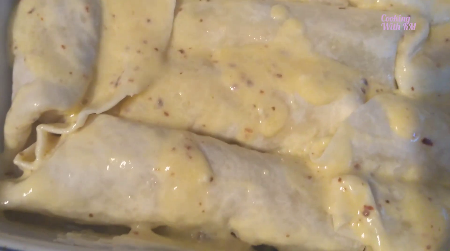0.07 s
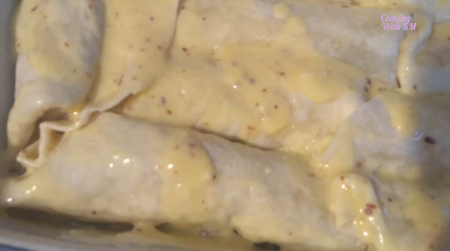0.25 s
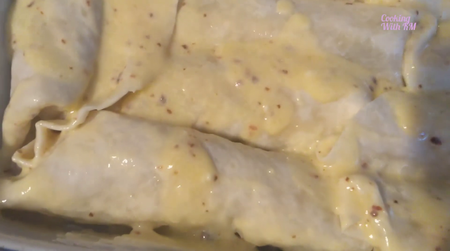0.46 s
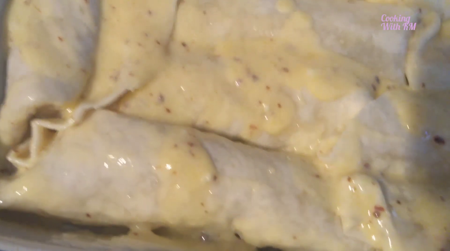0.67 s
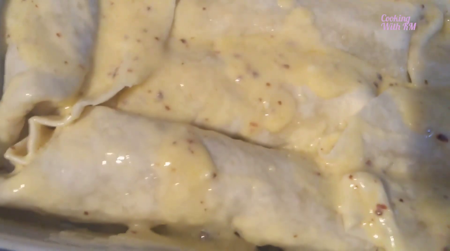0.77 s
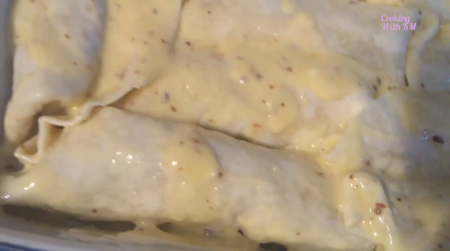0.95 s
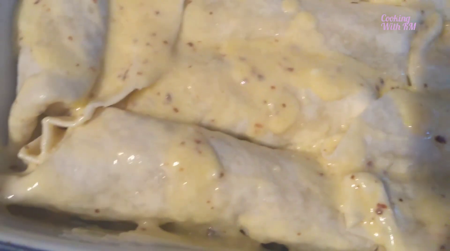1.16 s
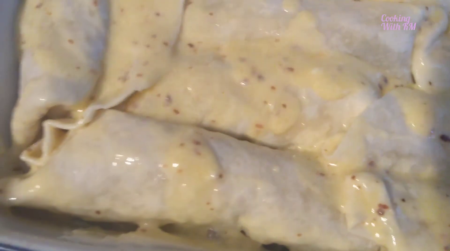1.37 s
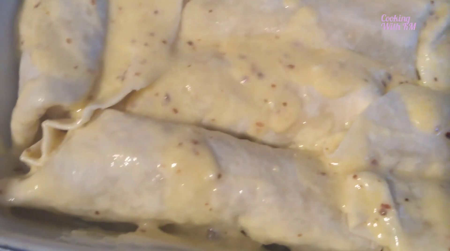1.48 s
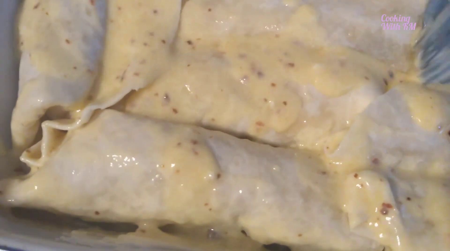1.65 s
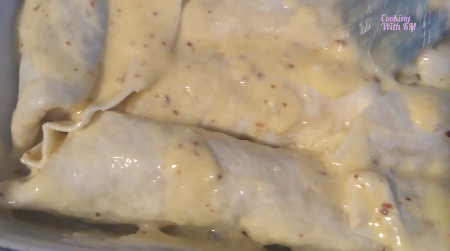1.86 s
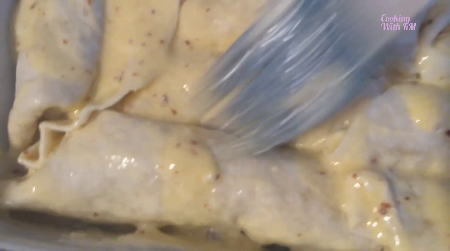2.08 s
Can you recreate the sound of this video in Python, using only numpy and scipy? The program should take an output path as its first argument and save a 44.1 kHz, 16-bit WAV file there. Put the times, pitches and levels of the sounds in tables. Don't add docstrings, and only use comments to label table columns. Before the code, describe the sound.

A brush handle knocks a baking dish on a hollow counter: one loud, dull thunk at 0.22 seconds, weaker rattling bounces, then a tight clatter at 0.41-0.45 with brief glassy ringing. Low fridge hum and room noise dip, then slowly rise. A tiny wet click at 0.9, faint squeak at 1.23, bristle scratch and sharp click near 1.65, light bright rim tap at 1.72, faint clicks at 1.83.

```python
import sys
import numpy as np
from scipy import signal
from scipy.fft import rfft, irfft, next_fast_len
from scipy.io import wavfile

SR = 44100
rng = np.random.default_rng(int(sys.argv[2]) if len(sys.argv) > 2 else 0)


def undo_db(level):
    steps = np.asarray(level, float) / 20
    return 10 ** steps


def put_to_file(sound):
    columns = np.atleast_2d(sound).T
    safe = np.clip(columns, -1, 1)
    whole_steps = np.round(safe * 32767)
    wavfile.write(sys.argv[1], SR, whole_steps.astype(np.int16))


N = 92610

BRUSH_RIGHT_LAG_S = 0.00008


def rms_one(x):
    return x / np.sqrt(np.mean(x ** 2) + 1e-20)


def since(s):
    return np.arange(N) / SR - s


def at_hz(points, hz):
    table_hz, value = np.transpose(points)
    return np.interp(np.log(hz), np.log(table_hz), value)


def band(x, low_hz, high_hz):
    return signal.sosfilt(signal.butter(2, [low_hz, high_hz], "band", fs=SR, output="sos"), x)


def body_low_cut(x):
    return signal.sosfilt(signal.butter(4, 217, "high", fs=SR, output="sos"), x)


def drift(rate_hz):
    hop = 40
    r = np.exp(-2 * np.pi * rate_hz * hop / SR)
    noise = rng.standard_normal(N // hop + 2002)
    slow = signal.lfilter([1], [1, -2 * r, r * r], noise)[2000:]
    return np.interp(np.arange(N) / hop, np.arange(len(slow)), rms_one(slow))


def ring(clicks, hz, t60):
    r, w = undo_db(-60 / (t60 * SR)), 2 * np.pi * hz / SR
    return signal.lfilter([0, np.sin(w)], [1, -2 * r * np.cos(w), r * r], clicks + 1e-18)


def pan(db):
    return undo_db([[db / 2], [-db / 2]])


def late(x, side, s):
    out = x.copy()
    out[side] = np.interp(since(s), since(0), x[side])
    return out


def air():
    # f/Hz, level/dB per Hz
    spectrum = [(30, -43), (60, -11), (150, -16.5), (300, -9.5), (700, -24.5), (1800, -29.5), (5000, -37.5),
                (14500, -46)]
    # f/Hz, correlation
    likeness = [(60, 0.68), (300, 0.58), (1000, 0.1), (4000, 0.093)]
    level_db, patchy_db = -10, 1.32
    out, edges = 0, 30 * 2 ** np.arange(0, 9.1, .5)
    white = rng.standard_normal((2, 2, N))
    for k, (low, high) in enumerate(zip(edges, edges[1:])):
        mid, side = band(white[k % 2], low, high)
        hz = np.sqrt(low * high)
        alike = np.clip(at_hz(likeness, hz), -1, 1)
        stereo = np.sqrt(1 + alike) * mid + np.sqrt(1 - alike) * side * [[1], [-1]]
        out = out + undo_db(at_hz(spectrum, hz) + patchy_db * drift(1.8)) * stereo
    return undo_db(level_db) * rms_one(out)


def hum():
    # f/Hz, left level/dB, right level/dB, right phase lag/rad
    lines = [(55.8, -38.5, -7, 2.1), (119.2, 1, -7.5, -0.96), (165.2, -14.5, -16.5, 0.57),
             (238.5, -13.5, -14.5, 1.32), (493, -22.5, -32, 0.47)]
    waver_db = .6
    out = np.zeros((2, N))
    for hz, left_db, right_db, lag in lines:
        level = np.sqrt(2) * undo_db([[left_db], [right_db]]) * undo_db(waver_db * drift(1.8))
        out += level * np.sin(2 * np.pi * hz * since(0) - np.array([[0], [lag]]))
    return out


def squeak():
    # t/s, length/s, f/Hz, level/dB, pan/dB
    slips = [
        (1.226, .045, 3400, -54, 3),
        (1.254, .03, 2775, -55, 2),
        (1.278, .02, 2915, -58, 2),
        (1.24, .03, 3850, -65, 2),
        (1.278, .04, 3790, -66, 4),
        (1.295, .025, 2760, -64, 0),
    ]
    level_db, wobble_hz, rub_db = -0.5, 17.8, -9
    out = np.zeros((2, N))
    rub = rms_one(band(rng.standard_normal((2, N)), 2400, 3760))
    for s, length, hz, db, pan_db in slips:
        shape = np.sin(np.pi * np.clip(since(s) / length, 0, 1)) ** .7
        phase = 2 * np.pi * np.cumsum(hz + wobble_hz * drift(56.0)) / SR
        level = undo_db(db + level_db + 2 * drift(81))
        out += level * shape * (np.sin(phase) + undo_db(rub_db) * rub) * pan(pan_db)
    return out


def clicks():
    # t/s, level/dB, dull part relative level/dB, pan/dB
    snaps = [(0.911, -55, -3, 13), (1.6235, -66, 16, 1), (1.626, -66, 17, 1), (1.6282, -62, 13, 0),
             (1.629, -64, 14, 2), (1.633, -61, -6, 2), (1.6365, -55.5, 9, 12), (1.64, -59, 7, 9),
             (1.644, -47, -18, 20), (1.6489, -25.5, -6.5, 10.5), (1.6526, -37, -21, 11),
             (1.8325, -68, 18, 7), (1.8372, -65, 25, 5), (1.839, -67.5, 24.5, 8), (1.8385, -78, 14, 6)]
    # f/Hz, level/dB, t60/s
    dull_modes = [(800, 1.5, 0.0035), (1500, -13, 0.0015), (2650, 6, 0.0011)]
    # f/Hz, level/dB, t60/s
    bright_modes = [(6200, -27, 0.0023), (8680, 6, 0.003), (11750, -14.5, 0.0092)]
    dull, bright = np.zeros((2, 2, N))
    for s, db, dull_db, pan_db in snaps:
        dull[:, int(s * SR)] += undo_db(db + dull_db) * pan(pan_db)[:, 0]
        bright[:, int(s * SR)] += undo_db(db) * pan(pan_db)[:, 0]
    scratch_from_s, scratch_to_s, scratch_per_s, scratch_db = 1.62, 1.648, 1500, -58
    during = (since(scratch_from_s) > 0) * (since(scratch_to_s) < 0)
    scratch = during * (rng.random((2, N)) < scratch_per_s / SR) * rng.standard_normal((2, N))
    dull += undo_db(scratch_db) * scratch[0]
    bright += undo_db(scratch_db - 7.5) * scratch[1]
    out = np.zeros((2, N))
    for impulses, modes in ((dull, dull_modes), (bright, bright_modes)):
        for hz, db, t60 in modes:
            out += undo_db(db) * ring(impulses, hz, t60)
    return late(out, 1, BRUSH_RIGHT_LAG_S)


def tap():
    # f/Hz, level/dB, t60/s
    rim_modes = [(329, 5, 0.06), (429.5, -5.5, 0.09), (600, -1.5, 0.036), (747, -8.5, 0.067),
                 (1119, -13.5, 0.066), (1410, -16.5, 0.03), (2940, -3.5, 0.0063), (5490, -4, 0.015),
                 (5400, -1, 0.024), (5770, 2.5, 0.025), (7070, 0, 0.0081), (8920, 6.5, 0.005),
                 (10300, 1, 0.0044)]
    tap_s, tap_db, chatter_s, pan_db = 1.7195, -30, 0.018, 6
    hiss_db, hiss_from_hz = 0.5, 3300
    t = since(tap_s)
    envelope = (t > 0) * np.exp(-(t / chatter_s) ** 2)
    chatter = envelope * rng.standard_normal((len(rim_modes) + 2, N))
    chatter[:2] *= np.exp(-np.abs(t) / 0.0022)
    hiss = undo_db(hiss_db) * signal.lfilter(*signal.butter(1, hiss_from_hz, "high", fs=SR), chatter[-2:])
    chatter /= np.sqrt((chatter ** 2).sum(axis=1, keepdims=True))
    body = sum(undo_db(db) * ring(c, hz, t60) for (hz, db, t60), c in zip(rim_modes, chatter))
    return late(undo_db(tap_db) * pan(pan_db) * (body_low_cut(body) + hiss), 1, BRUSH_RIGHT_LAG_S)


def knocks():
    # t/s, level/dB, contact cut-off f/Hz, crack level/dB
    impacts = [(0.2245, -5.5, 1700, 7), (0.233, -17.5, 905, 9), (.245, -23, 900, -1),
               (0.257, -29.5, 1200, -1), (0.266, -30.5, 505, -6), (.281, -36, 500, -7),
               (0.296, -30, 494, -15), (0.3042, -16.5, 593, -24), (.313, -26, 800, -16),
               (.362, -26, 400, 5), (0.386, -27.5, 300, -15), (.404, -23.5, 454, -8),
               (0.4125, -17.5, 800, 3), (.4195, -23, 1800, -1.5), (0.4226, -12.5, 1500, 6),
               (0.4242, -26, 1600, -4), (0.4287, -15, 1850, 7), (0.4341, -11.5, 800, -4),
               (0.4434, -12, 1400, -1.5), (.451, -23, 1410, -5), (0.455, -42, 900, -5),
               (0.473, -29, 800, -12), (0.499, -49, 900, -11.5), (0.558, -40.5, 500, -26),
               (1.579, -43.5, 1300, -6), (1.594, -51, 910, -16), (1.825, -46, 1200, -8)]
    # f/Hz, level/dB, t60/s
    body_modes = [(187.7, -9, 0.15), (237, -7, 0.11), (322.4, 0.5, 0.077), (463.5, -6, 0.066),
                  (567.4, -15.5, 0.066), (670, -11, 0.054), (817, -15, 0.089), (421, 2.5, 0.0092),
                  (1054, -11, 0.05), (1321, -12.5, 0.027), (1440, -7, 0.014), (1712, -8.5, 0.015),
                  (2266, -9, 0.023), (2980, -27, 0.011)]
    # t/s, f/Hz, level/dB, t60/s
    long_rings = [
        (.443, 883, -44, .62),
        (.308, 326, -24, .2),
        (.225, 7950, -74, .5),
        (.3045, 8040, -74, .5),
        (.36, 7900, -74, .4),
        (.41, 8010, -72, .3),
        (.225, 5000, -53, .15),
        (.232, 5350, -58, .12),
        (.33, 12000, -76, .4),
    ]
    scatter_cycles, mode_pan_db, knock_pan_db, left_lag_s = 0.21, .8, 1.7, 0.00014
    crack_db, crack_t60_s, crack_rise_s = -21.5, 0.023, .0012
    rattle_db, rattle_t60_s, grit_top_db = -43.5, 0.28, -15.5

    blows, cracks = np.zeros((len(body_modes), 2, N)), np.zeros((2, N))
    spread = rng.normal(0, 1, (len(impacts), 3, len(body_modes)))
    t = np.arange(300) / SR
    for (s, db, cut_hz, crack_rel_db), (chance, wait, side) in zip(impacts, spread):
        contact = t * np.exp(-2 * np.pi * cut_hz * t)
        contact = contact / contact.sum()
        for m, (hz, _, _) in enumerate(body_modes):
            i = int((s + scatter_cycles * abs(wait[m]) / hz) * SR)
            strength = undo_db(db + 2.5 * chance[m]) * pan(mode_pan_db * side[m])
            blows[m, :, i:i + 300] -= strength * contact
        fade = -60 * np.abs(since(s))
        crack = undo_db(crack_db + crack_rel_db + fade / crack_t60_s)
        rattle = undo_db(rattle_db + fade / rattle_t60_s)
        cracks += undo_db(db) * (crack + rattle) * np.clip(since(s) / crack_rise_s, 0, 1)

    out = body_low_cut(sum(undo_db(db) * ring(blow, hz, t60) for (hz, db, t60), blow in zip(body_modes, blows)))
    grit = cracks * rng.standard_normal((2, N))
    out += band(grit, 1200, 3340)
    out += undo_db(grit_top_db) * signal.lfilter([.5], [1, -.5], grit)
    for s, hz, db, t60 in long_rings:
        impulse = 1. * (np.arange(N) == int(s * SR))
        out += undo_db(db) * ring(impulse, hz, t60) * pan(1.5)
    return late(out * pan(knock_pan_db), 0, left_lag_s)


def kitchen(x):
    t60_s, wall_cut_hz, side_from_hz, build_up_s = 0.3, 6000, 410, 0.0028
    t = np.arange(int(.6 * SR)) / SR
    mid, side = rng.standard_normal((2, len(t))) * np.clip(t / build_up_s, 0, 1) ** 2
    side = signal.lfilter(*signal.butter(2, side_from_hz, "high", fs=SR), side)
    dull = signal.lfilter(*signal.butter(1, wall_cut_hz, fs=SR), [mid + side, mid - side])
    tail = rms_one(dull * undo_db(-60 * t / t60_s)) / np.sqrt(len(t))
    return signal.fftconvolve(x, tail, axes=1)[:, :N]


def scene():
    # t/s, level/dB
    ride_points = [(0, -47), (0.222, -45.5), (.25, -44), (.28, -55), (.39, -44), (.43, -53.5), (0.5, -53.5),
                   (.75, -50), (1.0, -48), (1.25, -46), (1.45, -44.5), (1.62, -43.5), (1.699, -45.5),
                   (1.85, -43), (2.1, -45)]
    ride = undo_db(np.interp(since(0), *np.transpose(ride_points)))
    dish, rim, wet_clicks, far = knocks(), tap(), clicks(), squeak()
    to_room = undo_db(-14.5) * dish + undo_db(-8.5) * rim + undo_db(-19.5) * wet_clicks + undo_db(-5) * far
    return dish + rim + wet_clicks + far + kitchen(to_room) + ride * (hum() + air())


def roll_off(x):
    return signal.sosfilt(signal.butter(12, 14640, fs=SR, output="sos"), x)


def record(dry):
    share, lag_s, from_hz, to_hz, top_hz = .78, 0.0004801, 426, 8500, 13500
    size = next_fast_len(N + 4096)
    hz = np.arange(size // 2 + 1) * SR / size
    delay = np.exp(-2j * np.pi * hz * lag_s)
    cross = share * delay * hz ** 2 / (hz ** 2 + from_hz ** 2) / (1 + (hz / to_hz) ** 4.0)
    wide = dry - irfft(rfft(dry[::-1], size) * cross, size)[:, :N]
    wide = signal.sosfilt(signal.butter(12, top_hz, fs=SR, output="sos"), wide)
    return roll_off(wide)


dry = scene()
out = record(dry)
put_to_file(out)
```